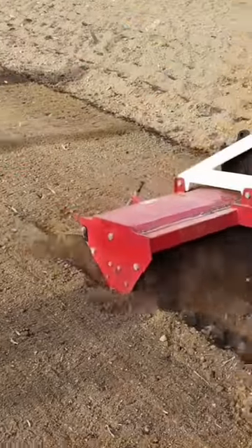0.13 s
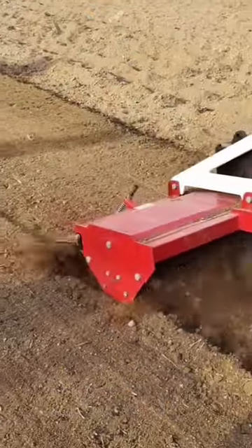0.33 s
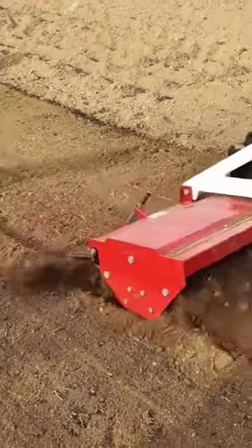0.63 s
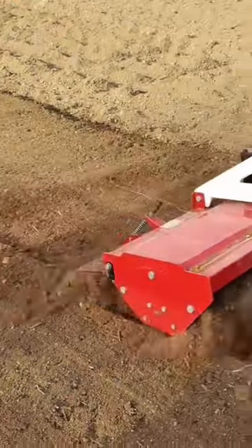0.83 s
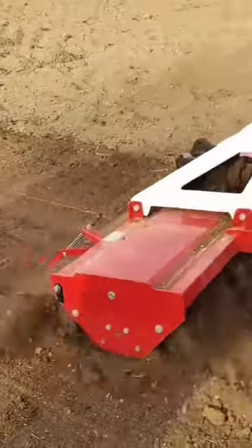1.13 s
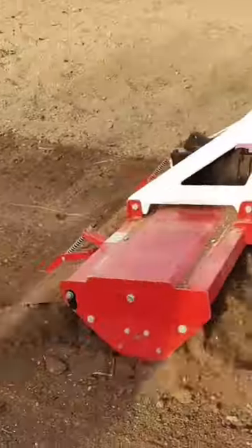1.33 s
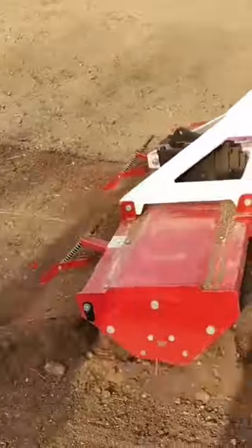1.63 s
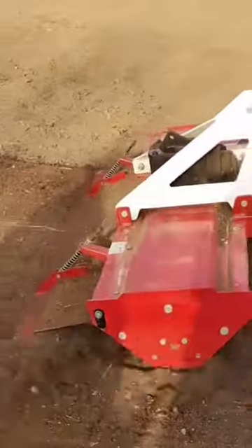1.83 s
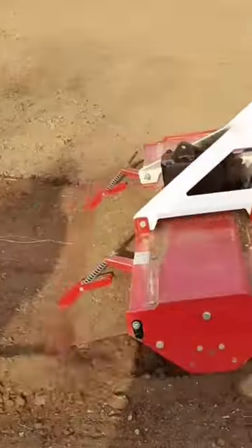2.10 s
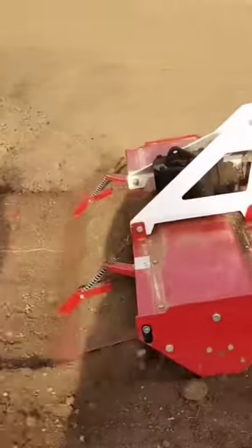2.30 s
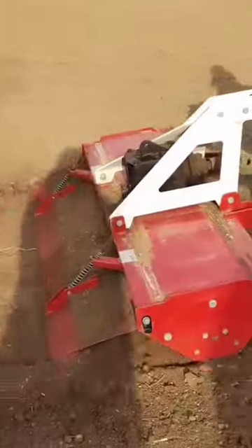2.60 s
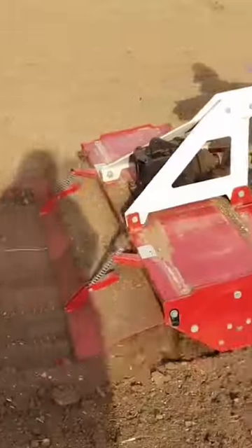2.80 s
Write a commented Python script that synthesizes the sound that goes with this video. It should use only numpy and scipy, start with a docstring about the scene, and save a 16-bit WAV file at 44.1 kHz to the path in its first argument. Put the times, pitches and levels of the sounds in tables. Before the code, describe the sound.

Close by outdoors, a diesel tractor throbs and clatters without pause as a rotary tiller grinds dry earth, crumbs pattering on its steel hood; loose clacks come mostly early, and the whole eases slightly, with no echo.

```python
"""Tractor and rotary tiller

A diesel tractor pulls a rotary tiller through dry soil, close by in an open field.
Gliding sine oscillators give one low boom per engine cycle, sagging in pitch, and a round of shorter knocks,
most of which soften as the tractor moves on. Filtered noise gives the clatter, the gritty rush of churned earth
and a little wind rumble below. Random impulses give the crumbs and set the steel hood and loose parts ringing;
damped tones of unsteady pitch give single short clacks, some of which strengthen an engine knock."""
import sys
import numpy as np
from scipy import signal
from scipy.fft import rfft, irfft
from scipy.io import wavfile
from scipy.ndimage import uniform_filter1d

SR = 44100
rng = np.random.default_rng(int(sys.argv[2]) if len(sys.argv) > 2 else 0)


def to_wav(sig):
    """Store sig (one row per channel, or 1-D mono) as 16-bit WAV at the path in sys.argv[1].

    Samples outside -1..1 are clipped; the rate is SR.
    """
    pcm = np.clip(np.atleast_2d(sig), -1, 1) * 32767
    pcm = np.round(pcm).astype(np.int16)
    wavfile.write(sys.argv[1], SR, pcm.T)  # frames by channels


N = 130095
T = np.arange(N) / SR  # time, s
F = np.arange(N // 2 + 1) * SR / N  # frequency of each spectral bin, Hz

# engine cycle: rate at the first firing, its slow gain, time of that firing, start of the cycle ahead of it
CYCLE_HZ, SPEEDUP_HZ_PER_S, FIRST_S, LEAD_S = 16.385, .032, .0382, .02


def cycle_starts():
    """Uniform acceleration: start times of the engine cycles as the engine gains a little speed."""
    since = np.arange(-1, 50) / CYCLE_HZ
    return FIRST_S - LEAD_S + since - SPEEDUP_HZ_PER_S * since ** 2 / 2 / CYCLE_HZ


# the boom through one engine cycle: t/s in the cycle, f/Hz, level/dB before BOOM_DB and effort
BOOM = [(.010, 195, -34.5), (0.022, 191, -23), (0.025, 221, -13.5), (0.023, 216.5, -14), (0.03, 185, -13.5),
        (0.032, 135, -14.5), (0.039, 149, -19.5), (.041, 171.4, -13.5), (0.043, 140.6, -23.5),
        (0.049, 112, -27.5), (0.052, 146, -21), (0.064, 185.4, -33), (0.07, 187.6, -25)]
# advance of the boom's phase: t/s, step per cycle/turns, scatter/turns
PHASE_CREEP = [(0, -0.19, 0.16), (.5, -0.023, 0.19), (0.656, 0.14, 0.1), (1.298, 0.24, 0.023),
               (1.501, 0.16, 0.11), (1.622, -0.014, 0.034), (1.754, 0.29, 0.018), (2.95, 0.33, 0.036)]
# strength of the firings: t/s, level/dB
EFFORT = [(.02, 0.5), (.08, -3), (.14, 0), (.3, -2), (.39, -0.5), (.57, -1), (.8, -1.6), (1.3, -1),
          (1.67, -1.8), (1.78, -1), (2.05, -1.5), (2.4, -2), (2.9, -2.3)]
BOOM_DB, BOOM_WOBBLE = 1, .016  # gain; pitch scatter as a fraction
BOOM_LAG_S, BOOM_SMOOTH_S, BOOM_EDGE_S = .00012, .0015, .01


def boom():
    """Frequency and amplitude modulation: an exhaust boom sags in pitch, with weaker after-beats."""
    at, hz, db = np.array(BOOM).T
    when, creep, scatter = np.array(PHASE_CREEP).T
    starts, out = cycle_starts(), np.zeros((2, N))
    pitches, slips = rng.standard_normal((len(starts), 2)).T
    first_turns = np.cumsum(np.interp(starts, when, creep)) + np.interp(starts, when, scatter) * slips
    strengths_db = BOOM_DB + np.interp(starts, *np.array(EFFORT).T)
    length = at[-1] + BOOM_EDGE_S
    for start, first_turn, strength_db, pitch in zip(starts, first_turns, strengths_db, pitches):
        i = np.flatnonzero((T > start) & (T < start + length))
        if len(i):
            age = T[i] - start
            edge = np.clip(np.minimum(age, length - age) / BOOM_EDGE_S, 0, 1)
            pitch_hz = smooth(np.interp(age, at, hz)) * (1 + BOOM_WOBBLE * pitch)
            turns = np.cumsum(pitch_hz) / SR + first_turn
            swell = edge * smooth(undb(np.interp(age, at, db) + strength_db))
            # successive booms overlap and add
            out[:, i] += swell * np.sin(2 * np.pi * np.array([turns, turns - pitch_hz * BOOM_LAG_S]))
    return out


def smooth(curve):
    """Moving average, applied twice: round the corners of a control curve."""
    size = int(BOOM_SMOOTH_S * SR)
    return uniform_filter1d(uniform_filter1d(curve, size), size)


# knocks of one cycle: t/s in the cycle, f/Hz, drift over the scene/octaves per s, glide within a knock/octaves
# per s, Gaussian half length/s, first level/dB, last level/dB, left lead/s, pan to the left/dB, phase scatter/turns
KNOCKS = [(.007, 1225, -0.053, -2.5, 0.0032, -22, -32.5, 0.00019, 5.5, 0.19),
          (.007, 2050, -0.014, -8, 0.0026, -42.5, -42.5, 0.000095, 1, 0.46),
          (.012, 564, 0.062, -13, 0.0053, -22, -41.5, 0.00019, -1.5, 0.45),
          (.0215, 425, -0.014, -80, 0.0038, -21.5, -27.5, 0.00015, 0, 0.17),
          (.023, 1215, -0.038, -18, 0.0088, -34.5, -36.5, 0.00038, 9.5, 0.32),
          (.038, 812, 0.088, 5, 0.0032, -37, -28.5, .00018, 7.5, 0.19),
          (.0415, 396, 0, -50, 0.0019, -22, -26, 0.00015, 0, 0.11),
          (.051, 642, 0.024, -7.5, 0.0035, -28.5, -51, 0.000064, -10.5, 0.41),
          (.053, 1314, -0.074, 14, 0.0063, -32, -34, 0.00042, 5, 0.44)]
KNOCK_SCATTER_DB, KNOCK_WOBBLE, KNOCK_JITTER_S = 2.24, .062, .00049
KNOCK_ROUGH_RAD, KNOCK_CREEP_TURNS = .59, -.29  # phase wander; phase step per cycle
KNOCK_SETTLE_S = 1.72  # the knocks ease from their first level towards their last


def knocks():
    """Gaussian tone bursts: short, rough knocks at fixed places in the cycle, each a little different."""
    out, starts = np.zeros((2, N)), cycle_starts()
    for at, hz, drift, glide, half, first_db, last_db, lag, pan_db, loose in KNOCKS:
        rough = KNOCK_ROUGH_RAD * walk(700)
        pan = undb([[pan_db / 2], [-pan_db / 2]])
        chances = rng.standard_normal((len(starts), 4))
        for k, (start, (size, pitch, late, slip)) in enumerate(zip(starts, chances)):
            centre = start + at + KNOCK_JITTER_S * late
            i = np.arange(*np.clip([int((centre - .03) * SR), int((centre + .03) * SR)], 0, N))
            age = T[i] - centre
            pitch_hz = hz * (1 + KNOCK_WOBBLE * pitch) * 2 ** (drift * start + glide * age / 2)
            turns = pitch_hz * age + k * KNOCK_CREEP_TURNS + loose * slip
            eased_db = last_db + (first_db - last_db) * np.exp(-start / KNOCK_SETTLE_S)
            swell = np.exp(-.5 * (age / half) ** 2) * undb(eased_db + KNOCK_SCATTER_DB * size)
            phase = 2 * np.pi * np.array([turns, turns - pitch_hz * lag]) + rough[i]
            out[:, i] += swell * np.sin(phase) * pan
    return out


# spectrum of the engine and gearbox clatter: f/Hz, relative level/dB per Hz
CLATTER = [(100, 3.5), (250, -1), (400, 6), (520, 0), (640, -6.5), (780, -4.5), (1000, 0.5), (1380, -11.5),
           (1580, -18.5), (3000, -41), (8000, -82)]
CLATTER_DB, CLATTER_FADE_DB_PER_S = -35.5, -.5  # rms before fade, waver and pulse
CLATTER_LAG_S, CLATTER_SPREAD = .00016, .083
CLATTER_PULSE_DB, CLATTER_PULSE_S = .5, .011


def clatter():
    """Modulated noise: dense clatter swells with each cycle and fades as the tractor draws away."""
    hiss = level(colour(ports(noise, CLATTER_SPREAD, CLATTER_LAG_S), CLATTER), CLATTER_DB)
    waver_db = 3.1 * walk(90)
    return hiss * undb(CLATTER_FADE_DB_PER_S * T + waver_db) * throb(CLATTER_PULSE_DB, CLATTER_PULSE_S)


# resonances of the loose linkage and flap: f/Hz, half width/Hz, relative level/dB
RATTLE = [(333, 52, 2), (636, 94, -2), (914, 81, -4), (1147, 69, -1), (1338, 38, 2.5), (1930, 240, -11),
          (2526, 41, -8.5), (3333, 61, -19), (3750, 150, -18.5)]
RATTLE_DB, RATTLE_FADE_DB_PER_S = -36, -2  # rms before the fade
RATTLES_PER_S, RATTLE_SCATTER_DB = 190, 2


def rattle():
    """Impulse excitation: loose parts chatter, each at random moments and with its own resonance."""
    taps = lambda: crumbs(RATTLES_PER_S, RATTLE_SCATTER_DB)
    parts = sum(level(ring(ports(taps, HOOD_SPREAD, HOOD_LAG_S), hz, width), db) for hz, width, db in RATTLE)
    return level(parts, RATTLE_DB) * undb(RATTLE_FADE_DB_PER_S * T)


# spectrum of thrown earth: f/Hz, relative level/dB per Hz
SOIL = [(300, -12.5), (900, 3.5), (1700, 1), (2400, 3), (2800, -2), (4000, -5), (4800, -11.5), (7000, -10),
        (8200, -19.5), (10500, -17), (12500, -28), (13500, -27), (15500, -27)]
# resonances of the steel hood and gear case: f/Hz, half width/Hz, relative level/dB
HOOD = [(1167, 38, 5), (1333, 96, -2.5), (1780, 82, -7.5), (2150, 53, -16), (3055, 30, -8), (3400, 17, -19),
        (3866, 25, -10), (4295, 70, -19), (4880, 22, -19), (6700, 16, -15), (6990, 110, -19),
        (7915, 13, -50), (10300, 63, -41)]
# how hard the blades churn: t/s, level/dB
CHURN = [(0, 2), (.35, 4.5), (.7, 2.5), (1.1, 3), (1.5, 0.5), (2, -0.5), (2.4, 0.5), (2.95, -2)]
SOIL_DB, CRUMB_DB, HOOD_DB = -46.5, -48, -43  # rms before flicker, churn and pulse
SOIL_SPREAD, HOOD_SPREAD, HOOD_LAG_S = .78, .29, .000236
CRUMBS_PER_S, CRUMB_SCATTER_DB = 2200, 3
HOOD_CRUMBS_PER_S, HOOD_SCATTER_DB = 2500, 2.5
SOIL_PULSE_DB, SOIL_PULSE_S = -.08, .031  # negative: a very slight dip at this time in the cycle


def tiller():
    """Broadband noise and struck resonances: earth rushes, crumbs patter, dense spray rings the hood."""
    grains = lambda: crumbs(CRUMBS_PER_S, CRUMB_SCATTER_DB)
    spray = lambda: crumbs(HOOD_CRUMBS_PER_S, HOOD_SCATTER_DB)
    rush = level(colour(ports(noise, SOIL_SPREAD, HOOD_LAG_S), SOIL), SOIL_DB)
    patter = level(colour(ports(grains, SOIL_SPREAD, HOOD_LAG_S), SOIL), CRUMB_DB)
    hits = ports(spray, HOOD_SPREAD, HOOD_LAG_S)
    hood = level(sum(level(ring(hits, hz, width), db) for hz, width, db in HOOD), HOOD_DB)
    effort = undb(np.interp(T, *np.array(CHURN).T))
    return (flicker(rush + patter) + hood) * effort * throb(SOIL_PULSE_DB, SOIL_PULSE_S)


# edges of the flickering bands: f/Hz
SOIL_BANDS_HZ = [0, 1600, 2800, 4600, 7200, 9500, 12500, 22050]
SOIL_FLICKER_DB = 3


def flicker(x):
    """Independent band modulation: each band of the rush and patter wavers quickly on its own."""
    spectrum, out = rfft(x), 0
    for lo, hi in zip(SOIL_BANDS_HZ, SOIL_BANDS_HZ[1:]):
        band = irfft(spectrum * ((F >= lo) & (F < hi)), N)
        out = out + band * undb(SOIL_FLICKER_DB * walk(90))
    return out


# single short clacks: t/s, f/Hz, width/Hz (5 x pitch spread), decay/s, level/dB before decay;
# several fall on the engine's knocks and strengthen them
CLACKS = [(0.084, 1133, 300, 0.0027, -20), (0.097, 660, 297, 0.0016, -18),
          (0.111, 1077, 201, 0.0039, -21.5), (0.156, 340, 200, 0.014, -21), (.182, 658, 140, 0.02, -24.5),
          (0.233, 1656, 398, 0.008, -29), (0.332, 570, 194, 0.0061, -25.5),
          (0.387, 1174, 363, 0.012, -26.5), (0.513, 606, 160, .009, -20), (0.514, 1244, 393, 0.0034, -25),
          (0.54, 856, 294, 0.0044, -25), (0.658, 844, 250, 0.0067, -33), (1.06, 1307, 310, 0.0035, -32),
          (1.12, 1225, 304, 0.0054, -27), (1.303, 1029, 392, 0.0042, -24), (1.303, 2160, 601, .007, -29),
          (1.543, 1184, 408, 0.0049, -26), (1.605, 1055, 297, 0.0058, -25.5),
          (1.736, 1863, 377.5, 0.01, -34), (2.091, 964, 298, 0.0029, -27.5),
          (2.515, 655.2, 308, 0.0043, -29), (2.821, 1798, 250, 0.01, -37), (2.881, 1055, 298, 0.0059, -27)]
CLACK_ATTACK_S, CLACK_WAVER_PER_S = .0016, 360


def clacks():
    """Damped oscillation: single short clacks, each of unsteady pitch."""
    out = 0
    for at, hz, width, decay, db in CLACKS:
        pitch_hz = hz + width / 5 * walk(CLACK_WAVER_PER_S)
        attack = np.clip((T - at) / CLACK_ATTACK_S, 0, 1)
        out = out + level(tone(pitch_hz, CLATTER_LAG_S), db) * np.exp(-np.abs(T - at) / decay) * attack
    return out


# spectrum of the rumble at the microphone: f/Hz, relative level/dB per Hz
RUMBLE = [(10, 13), (25, 4), (40, 4), (70, -13), (110, -14), (200, 4), (400, -44), (2000, -90)]
# gusts on the microphone: t/s, Gaussian half length/s, rise in level/dB
GUSTS = [(0.215, 0.04, 5), (.6, .018, 7), (1.89, 0.038, 4), (2.14, 0.041, 6)]
RUMBLE_DB, RUMBLE_SPREAD, RUMBLE_PULSE_DB, RUMBLE_PULSE_S = -39.5, .05, 6, .039


def rumble():
    """Amplitude-modulated low noise: it heaves with the engine and swells in short gusts."""
    gust_db = sum(db * np.exp(-.5 * ((T - at) / half) ** 2) for at, half, db in GUSTS)
    low = colour(ports(noise, RUMBLE_SPREAD, 0), RUMBLE)
    return level(low * throb(RUMBLE_PULSE_DB, RUMBLE_PULSE_S) * undb(gust_db), RUMBLE_DB)


def undb(db):
    """Decibel definition: amplitude ratio of a level."""
    return 10 ** (np.asarray(db) / 20)


def level(x, db):
    """Root mean square: scale to an rms level over the whole signal."""
    return x * undb(db) / np.sqrt(np.mean(x ** 2))


def colour(x, points):
    """Spectral shaping: filter by (f/Hz, level/dB) points joined along log frequency."""
    hz, db = np.array(points, float).T
    return irfft(rfft(x) * undb(np.interp(np.log(np.maximum(F, 1)), np.log(hz), db)), N)


def ring(x, hz, width):
    """Resonance: two equal one-pole resonators in series, 6 dB down at hz +- width."""
    return irfft(rfft(x) / (1 + 1j * (F - hz) / width) ** 2, N)


def tone(pitch_hz, lag_s):
    """Phase as the integral of frequency: a tone of moving pitch that reaches the right port late."""
    turns = np.cumsum(pitch_hz) / SR + rng.random()
    return np.sin(2 * np.pi * np.array([turns, turns - pitch_hz * lag_s]))


def noise():
    """White noise: equal mean power at every frequency."""
    return rng.standard_normal(N)


def crumbs(per_s, scatter_db):
    """Random impulse process: tiny impacts of either sign, a few much larger than the rest."""
    sizes = undb(scatter_db * np.minimum(rng.exponential(size=N), 5))
    return (rng.random(N) < per_s / SR) * np.sign(noise()) * sizes


def walk(rate):
    """Smoothed random process: slow chance with a standard deviation of 1, drawn rate times a second."""
    k = int(SR / rate)
    steps = np.repeat(rng.standard_normal(N // k + 1), k)
    w = uniform_filter1d(uniform_filter1d(steps, k), k)[:N]
    return w / w.std()


def throb(depth_db, peak_s):
    """Periodic modulation: a gain that goes up and down by depth_db once per engine cycle."""
    starts = cycle_starts()
    return undb(depth_db * np.cos(2 * np.pi * np.interp(T - peak_s, starts, np.arange(len(starts)))))


def ports(draw, spread, lag_s):
    """Partial coherence: two microphone ports share a part, late at the right, and each has its own."""
    shared, spread = draw(), np.clip(spread, 0, 1)
    late = irfft(rfft(shared) * np.exp(-2j * np.pi * F * lag_s), N)
    return np.sqrt(1 - spread) * np.array([shared, late]) + np.sqrt(spread) * np.array([draw(), draw()])


def scene():
    """Superposition: the pressures of all sources add."""
    return boom() + knocks() + clatter() + rattle() + tiller() + clacks() + rumble()


TOP_HZ = 15750


def record(dry):
    """Band limiting: a steep elliptic low-pass cuts the top."""
    return signal.sosfilt(signal.ellip(8, .2, 70, TOP_HZ, fs=SR, output="sos"), dry)


dry = scene()
out = record(dry)
to_wav(out)
```